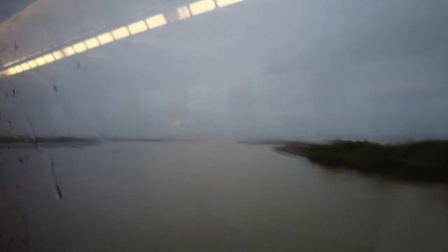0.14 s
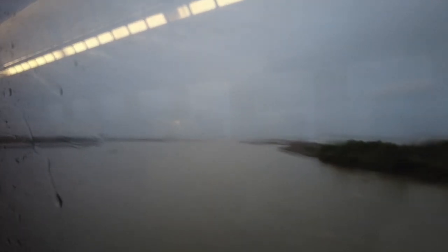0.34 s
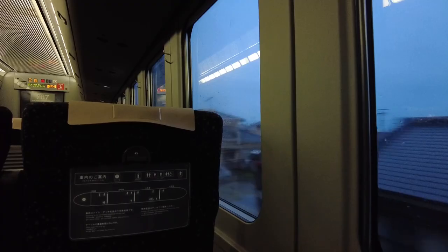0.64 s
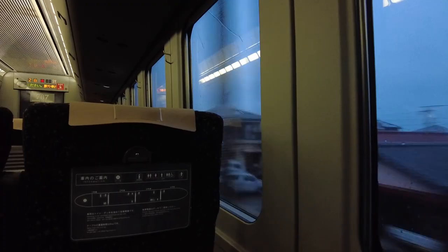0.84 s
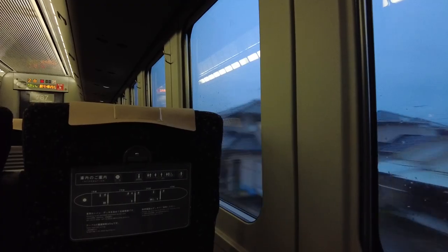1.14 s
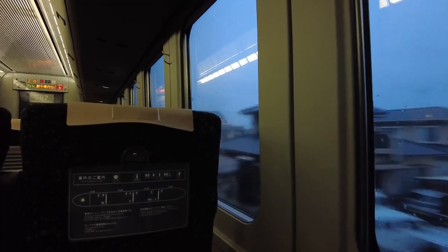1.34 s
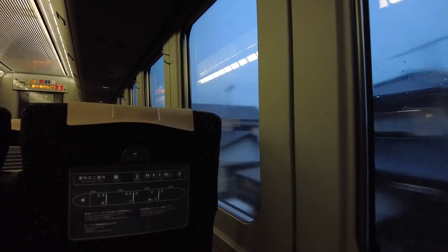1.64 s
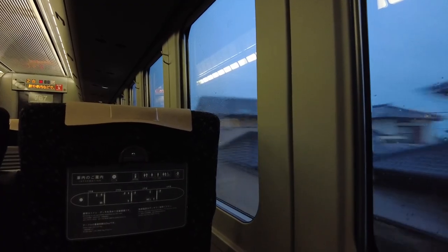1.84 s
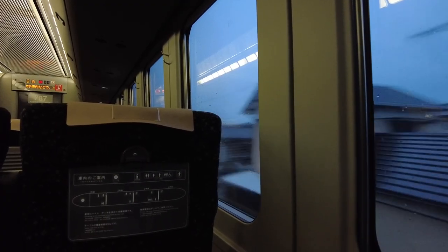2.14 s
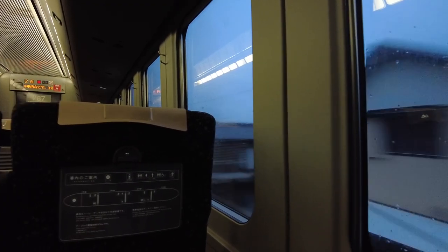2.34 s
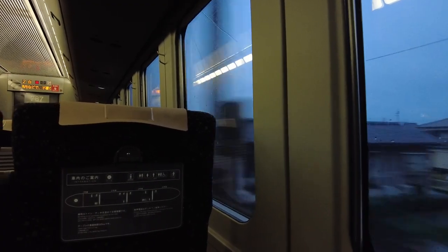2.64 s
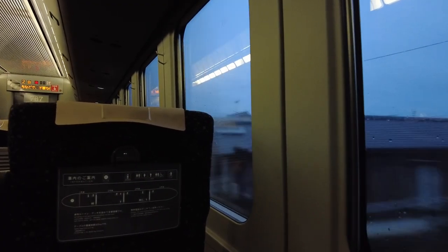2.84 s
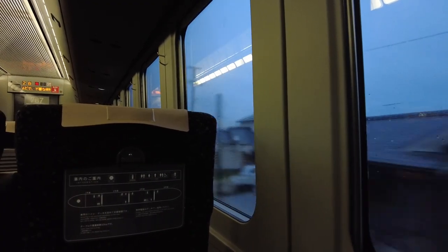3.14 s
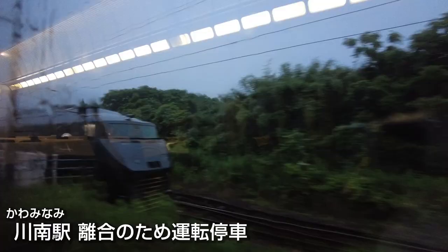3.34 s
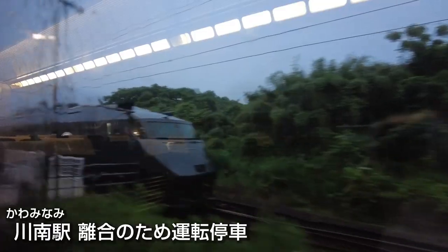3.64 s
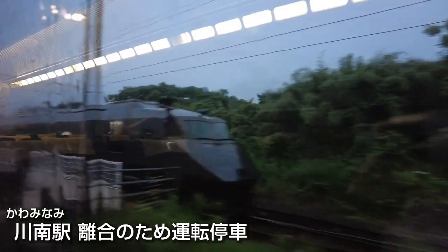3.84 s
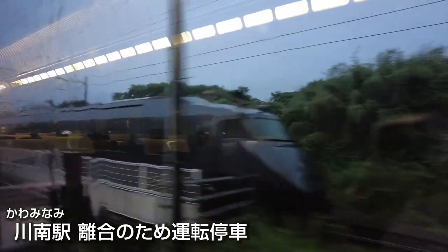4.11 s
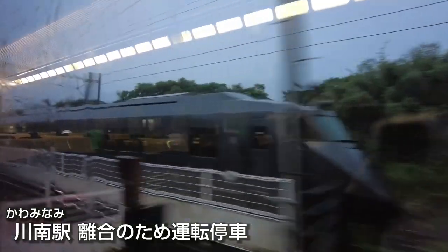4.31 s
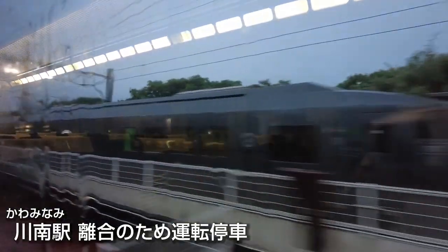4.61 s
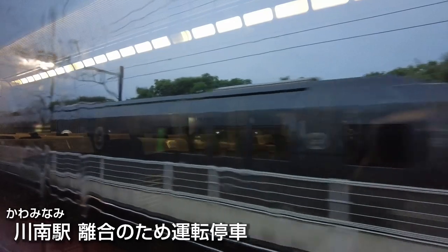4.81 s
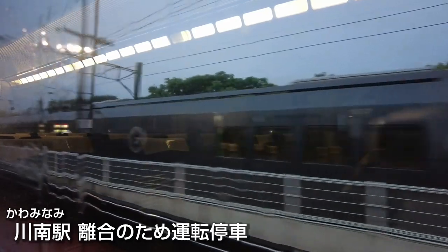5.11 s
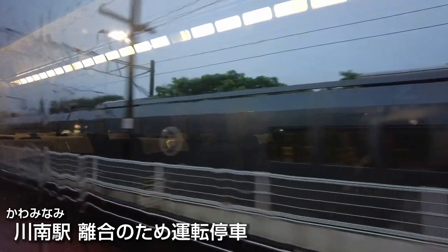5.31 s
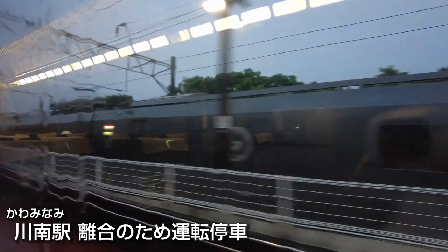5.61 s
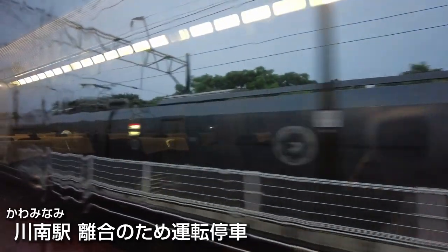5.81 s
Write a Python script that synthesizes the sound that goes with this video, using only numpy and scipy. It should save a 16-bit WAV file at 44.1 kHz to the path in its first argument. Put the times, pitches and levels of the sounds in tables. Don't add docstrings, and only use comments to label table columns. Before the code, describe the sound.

Inside a train carriage: boomy bridge rumble with a low hum, then loud fast rail clatter with rattling trim, then a much quieter low roll.

```python
import sys
import numpy as np
from scipy import signal
from scipy.io import wavfile
from scipy.ndimage import uniform_filter1d, minimum_filter1d

SR = 44100
rng = np.random.default_rng(int(sys.argv[2]) if len(sys.argv) > 2 else 0)


def attenuation_scalar(level_db):
    decades = np.asarray(level_db, float) / 20
    return 10 ** decades


def wav_out(sig):
    wavfile.write(sys.argv[1], SR, np.round(np.clip(np.atleast_2d(sig).T, -1, 1) * 32767).astype(np.int16))


N = 262836
RUN_IN, STEP, TAIL = SR // 6, 40, SR // 5
JOIN_S = .0025
OPPOSITE = np.array([[1], [-1]])


def rms_one(x):
    return x / np.sqrt(np.mean(x ** 2) + 1e-20)


def peak_one(x):
    return x / np.max(abs(x))


def at_hz(points, hz):
    table_hz, values = np.transpose(points)
    return np.interp(np.log(hz), np.log(table_hz), values)


def filtered(x, order, hz, kind="low"):
    return signal.sosfilt(signal.butter(order, hz, kind, fs=SR, output="sos"), x)


def resonate(x, hz, width_hz):
    r = np.exp(-np.pi * width_hz / SR)
    poles = [1, -2 * r * np.cos(2 * np.pi * hz / SR), r * r]
    return signal.lfilter(np.array([1, 0, -1]) * (1 - r * r) / 2, poles, x)


def resonate_twice(x, hz, width_hz):
    return resonate(resonate(x, hz, width_hz), hz, width_hz)


def drift(rate, size):
    r = np.exp(-2 * np.pi * STEP * rate / SR)
    wander = signal.lfilter([1], [1, -2 * r, r * r], rng.standard_normal(size + 2000))
    return rms_one(wander[2000:])


def faded(size):
    n = np.arange(size)
    return np.sin(np.pi / 2 * np.clip(np.minimum(n, size - n) / (JOIN_S * SR), 0, 1)) ** 2


def burst(rise_s, t60, size=TAIL):
    t = np.arange(size) / SR
    return (1 - np.exp(-t / rise_s)) * attenuation_scalar(-60 * t / max(t60, .02)) * faded(2 * size)[size:]


def leaned(db):
    return attenuation_scalar(db * np.array([[.5], [-.5]]))


# f/Hz, side minus mid level/dB
SIDE_DB = [(60, -24.5), (130, -18), (290, -12.5), (640, 2), (1410, -4), (3100, -2.5), (6820, 1.5),
           (15000, 2)]
# f/Hz, left minus right level/dB
LEAN = [(60, -1.5), (180, 0.5), (550, 2), (1650, 0.5), (4970, 0), (15000, 0.5)]


def spread(pair, hz):
    side = attenuation_scalar(at_hz(SIDE_DB, hz))
    both = (pair[0] + side * pair[1] * OPPOSITE) / np.sqrt(1 + side ** 2)
    return both * leaned(at_hz(LEAN, hz))


def add(out, s, sound):
    start = round(s * SR)
    cut = min(round(b * SR) for a, b in TAKES if b > s)
    end = min(start + sound.shape[-1], cut, N)
    size = end - start
    out[:, start:end] += sound[..., :size] * faded(2 * size)[size:]


# start t/s, end t/s
TAKES = [
    (0, .6645),
    (.6645, 3.3985),
    (3.3985, 5.96),
]
# f/Hz, level/dB per Hz
BRIDGE = [(9.4, -31), (16, 6.5), (38, -7.5), (85, -4.5), (107, -27), (123, 2), (147, -15), (269, -9),
          (310, -25.5), (414, -32.5), (675, -28.5), (981, -66.5), (1310, -53.5), (2200, -60), (7000, -72.5),
          (15600, -82)]
# f/Hz, level/dB per Hz
FAST = [(9.4, -31), (16, 3.5), (49, 0.5), (147, -9.5), (226, -15), (414, -21.5), (478, -32), (601, -31.5),
        (715, -40), (981, -51), (1270, -45), (2130, -56), (3100, -57), (6950, -70), (15600, -81)]
# f/Hz, level/dB per Hz
SLOW = [(9.4, -30), (16, 6), (37, -3.5), (54, -5), (98, -5), (169, -17), (246, -15), (310, -33.5),
        (521, -27.5), (695, -40), (953, -78.5), (1240, -50.5), (1960, -55), (3010, -58.5), (6300, -67),
        (7300, -72.5), (11500, -77.5), (13600, -83), (15600, -83.5)]
ROLLING_DB = [-20.5, -17.5, -27]


def carriage():
    out = np.zeros((2, N))
    for take, colour in enumerate([BRIDGE, FAST, SLOW]):
        start, end = (min(round(s * SR), N) for s in TAKES[take])
        end = min(end + round(JOIN_S * SR), N)
        n = start + np.arange(-RUN_IN, end - start)
        swell = swells(n[::STEP] / SR, take)
        swell -= 10 * np.log10(np.mean(10 ** (swell / 10), axis=1, keepdims=True))
        roll = attenuation_scalar(ROLLING_DB[take]) * rms_one(rolling(take, colour, n, swell))
        roll = roll + hollows(take, n, swell)
        out[:, start:end] += roll[:, RUN_IN:] * faded(end - start)
    return out


ZONES_HZ = [38, 150, 600, 2500]


def rolling(take, colour, n, swell):
    steps = n[::STEP]
    patchy_db = [1.5, 1.1, 1.2][take]
    together = drift(9, len(steps))
    white = rng.standard_normal((2, 2, len(n)))
    edges = 16 * 2 ** (np.arange(31) / 3)
    out = 0
    for k, (low, high) in enumerate(zip(edges, edges[1:])):
        hz = np.sqrt(low * high)
        place = np.interp(np.log(hz), np.log(ZONES_HZ), np.arange(4))
        below = min(int(place), 2)
        zone_db = swell[below] + (place - below) * (swell[below + 1] - swell[below])
        flicker_db = patchy_db * (0.61 * together + drift(8.8, len(steps)))
        if hz > 900:
            flicker_db = flicker_db * 1.5
        if take == 2 and hz > 3500:
            flicker_db = flicker_db * .4
        band = filtered(white[k % 2], 3 if 300 < hz < 2000 else 2, [low, high], "band")
        gain = np.interp(n, steps, attenuation_scalar(at_hz(colour, hz) + zone_db + flicker_db))
        out = out + gain * spread(steadied(band, hz, share=0.61), hz)
    return out


# f/Hz, width f/Hz, then level/dB on the bridge, fast, slow
HOLLOWS = [(28.03, 6.8, -19, -32, -32.5), (42.96, 5.6, -23.5, -19.5, -42.5), (249.5, 64, -39.5, -44, -34),
           (432.1, 12, -49.5, -44.5, -52), (699, 36, -64.5, -50, -56.5), (1240, 91, -61, -62.5, -64.5),
           (1634, 83, -91, -76, -80.5), (2900, 850, -68, -67, -69.5), (14900, 400, -92, -88.5, -99),
           (896, 18, -74, -60.5, -70.5)]


def hollows(take, n, swell):
    white = rng.standard_normal((2, 2, len(n)))
    out = 0
    for k, (hz, width_hz, *take_db) in enumerate(HOLLOWS):
        tone = rms_one(resonate_twice(white[k % 2], hz, width_hz))
        zone = np.argmin(abs(np.log(hz / np.array(ZONES_HZ))))
        gain = attenuation_scalar(take_db[take]) * np.interp(n, n[::STEP], attenuation_scalar(0.83 * swell[zone]))
        out = out + gain * spread(steadied(tone, hz, share=0.92), hz)
    return out


def steadied(x, hz, share):
    if hz > 260:
        return x
    power = uniform_filter1d(x[0, ::STEP] ** 2, max(round(2 * SR / hz / STEP), 1))
    mean = np.mean(power)
    gain = (mean / (power + 0.013 * mean)) ** (np.clip(share * 60 / hz, 0, .9) / 2)
    smooth = np.interp(np.arange(x.shape[1]) / STEP, np.arange(len(gain)), gain)
    return np.array([x[0] * smooth, x[1]])


# t/s, boom level/dB at the top, half length t/s
HEAVES = [(0.163, -14.5, 0.084), (0.383, -22.5, 0.04), (0.643, -19.5, 0.03), (0.888, -16.5, 0.033),
          (0.99, -14.5, 0.037), (1.174, -14, 0.033), (1.369, -15, 0.073), (1.524, -12, 0.029),
          (1.723, -14.5, 0.074), (1.899, -12.5, 0.041), (2.268, -15.5, .09), (2.415, -13, 0.037),
          (2.644, -22, .05), (2.768, -11, 0.089), (2.959, -16, 0.063), (3.145, -16, 0.055),
          (3.365, -22.5, 0.037), (3.556, -26.5, 0.049), (4.158, -28, 0.072), (4.461, -32, 0.065),
          (4.79, -29, 0.089), (5.112, -27.5, .07), (5.379, -25.5, 0.043), (5.607, -17.5, 0.028),
          (5.763, -22.5, .06)]
CALM_BOOM_DB = [-24.5, -24.5, -33]
JOINT_DB = [2.5, 2.6, 11.9, 6.3, 5.7, 11]
# t/s, jolt level/dB over the calm roar
LONE_JOINTS = [
    (.078, 11),
    (.178, 18),
    (4.61, 6.5),
    (5.027, 10.5),
    (5.175, 7),
]
# middle t/s, level/dB, half length t/s
STRETCHES = [(0.682, -3, 0.059), (0.972, 2.5, 0.071), (1.212, -4, 0.034), (1.271, 4, 0.13),
             (1.59, -2, 0.081), (1.899, -4.5, 0.11), (2.104, 2.5, 0.089), (2.551, -4.5, 0.15),
             (3.02, -3.5, 0.05), (3.298, -5.5, 0.096)]


def swells(t, take):
    s, top_db, half_s = np.transpose(HEAVES)[:, :, None]
    heaving = np.sum(attenuation_scalar(2 * top_db) * np.exp(-((t - s) / half_s) ** 2), axis=0)
    boom = attenuation_scalar(2 * CALM_BOOM_DB[take]) + heaving
    if take == 1:
        first_s, every_s, share = .83, .459, 1
        joints = [(first_s + k * every_s, level_db) for k, level_db in enumerate(JOINT_DB)]
    else:
        joints, share = LONE_JOINTS, 0.31
    s, peak_db, half_s = np.transpose(STRETCHES)[:, :, None]
    rough_db = np.sum(peak_db * np.exp(-((t - s) / half_s) ** 2), axis=0) * (take == 1)
    walls = surges(t, joints, share * 0.045)
    floor = attenuation_scalar(2 * 0.88 * rough_db) + attenuation_scalar(2 * -9) * surges(t, joints, share * 0.22)
    stir = attenuation_scalar(2 * 46) * surges(t, RATTLES, 0.045) * (take < 2)
    hiss = attenuation_scalar(2 * 0.14 * rough_db) + attenuation_scalar(2 * -8) * walls + stir
    return 10 * np.log10([boom, floor, attenuation_scalar(2 * rough_db) + walls, hiss])


def surges(t, events, dies_s):
    s, level_db = np.transpose(events)[:2, :, None]
    age = np.maximum(t - s, 0)
    rise = (1 - np.exp(-age / 0.0019)) ** 2
    return np.sum(attenuation_scalar(2 * level_db) * rise * np.exp(-age / dies_s), axis=0)


# t/s, peak level/dB, floor panel f/Hz,
# clang level/dB above it, ring t60 t/s
KNOCKS = [(.078, -26, 215, -17, 0.27), (.2, -17, 238, -11.5, 0.087), (.83, -17, 154.5, -9.5, 0.2),
          (0.932, -13.5, 163, -38, 0.049), (1.23, -15, 185, -24, 0.19), (1.315, -18, 240, -15, 0.17),
          (1.385, -20.5, 178.2, -26.5, 0.24), (1.762, -26.5, 279, -7, 0.34), (1.759, -13, 132.3, -31, 0.14),
          (1.839, -13.5, 151, -20.5, 0.059), (2.014, -26.5, 257.6, -16, 0.18),
          (2.153, -12.5, 147, -36.5, 0.078), (2.217, -10, 144.8, -20.5, 0.21),
          (2.226, -16.5, 240.4, -13.5, 0.065), (2.656, -14.5, 138.3, -16, 0.59),
          (2.732, -13, 137.8, -15, 0.73), (2.839, -19, 135, -23, 0.12), (2.913, -15.5, 151, -30, 0.13),
          (3.056, -13, 198.4, -26.5, 0.1), (3.135, -16.5, 194.5, -26, 0.11), (3.33, -14, 57.6, -33, 0.64),
          (4.654, -18.5, 95.7, -38.5, 0.6), (5.559, -27.5, 47, -42, .5), (5.728, -17.5, 32.8, -34.5, 1)]


def knocks():
    size = 2 * TAIL
    out, t = np.zeros((2, N)), np.arange(size) / SR
    for s, level_db, hz, clang_db, t60 in KNOCKS:
        panel = np.sin(2 * np.pi * hz * t) * burst(0.011, t60, size)
        neighbours = np.sin(2 * np.pi * 0.28 * hz * t) - np.sin(2 * np.pi * 1.28 * hz * t)
        neighbours = neighbours * burst(0.0059, 0.2, size)
        thump = peak_one(panel) + attenuation_scalar(-11.5) * peak_one(neighbours)
        late = 0.11 * np.roll(thump, TAIL // 100) * OPPOSITE
        noise = rng.standard_normal((2, size)) * burst(0.0011, .3, size)
        clang = filtered(resonate(resonate(noise, 480, 450), 510, 460), 3, 880)
        clang = attenuation_scalar(clang_db) * peak_one(spread(clang, 600))
        add(out, s - .004, attenuation_scalar(level_db) * (thump * leaned(.8) + late + clang))
    return out


# top t/s, peak level/dB, f/Hz, rise t/s
PINGS = [(0.102, -48, 914, 0.0065), (0.107, -38, 663, 0.0056), (0.192, -27.5, 695, 0.0055),
         (0.2, -46, 920, 0.0099), (0.22, -33, 468, 0.006), (0.229, -38, 740, 0.006),
         (0.247, -41, 851, 0.006), (0.663, -41, 995, 0.0071), (0.836, -38, 782, 0.0059),
         (0.858, -40, 783, 0.0066), (0.963, -24.5, 393, 0.0067), (1.073, -39.5, 760, 0.0088),
         (1.31, -41, 794, 0.0054), (1.342, -36, 744, 0.0067), (1.424, -31.5, 642, 0.011),
         (1.462, -37, 650, 0.0086), (1.502, -36.3, 702, 0.0097), (1.544, -32, 638, 0.006),
         (1.761, -34.5, 695, 0.016), (1.771, -32.5, 850, 0.0056), (1.776, -18, 289, 0.008),
         (1.781, -32, 506, 0.006), (1.816, -44, 910, 0.0046), (1.841, -37, 613, 0.0073),
         (1.856, -43.5, 863, 0.0059), (1.911, -37.5, 699, 0.023), (2.235, -28.5, 527, 0.006),
         (2.26, -35.5, 679, 0.006), (2.262, -53, 958, 0.0064), (2.681, -43, 700, 0.011),
         (2.686, -44.5, 840, 0.011), (2.734, -49, 896, 0.006), (2.774, -44.5, 897, 0.007),
         (3.148, -33.5, 546, 0.006), (3.155, -39.5, 745, 0.0078), (3.168, -43.5, 860, 0.013),
         (3.4, -55, 915, 0.005), (3.402, -53, 700, 0.0044), (4.62, -43, 716, 0.006),
         (4.747, -35.5, 713, 0.0064), (5.034, -53, 897, 0.0068), (5.034, -43, 540, 0.006),
         (5.036, -37, 712, 0.013), (5.068, -38, 570, 0.006), (5.131, -41, 702, 0.011),
         (5.183, -40, 462, 0.006), (5.196, -38.5, 690, 0.0066), (5.692, -57, 950, 0.0047)]
# top t/s, peak level/dB, f/Hz, rise t/s
CHINKS = [(.212, -49, 1395, 0.0052), (.656, -56, 3190, 0.0028), (.791, -53, 4460, 0.005),
          (.796, -53, 5560, 0.0035), (1.754, -48, 2460, .005), (1.756, -49.5, 2700, 0.006),
          (1.846, -53, 2660, 0.0049), (1.875, -45, 1540, .004), (1.926, -54, 4382, .004),
          (1.93, -46, 1610, 0.0032), (2.0, -56, 4380, .004), (2.008, -53, 5512, 0.0036),
          (2.013, -59, 3413, .004), (2.07, -60, 4700, .004), (2.103, -48, 3170, 0.0026),
          (2.105, -47.5, 2840, .003), (2.292, -56, 4760, .004), (2.3, -56, 5517, 0.0038),
          (3.332, -58, 4280, 0.0046), (3.335, -61, 5930, .004), (5.029, -57, 1530, 0.0065),
          (5.09, -48.5, 1226, 0.0057), (5.175, -50, 1260, 0.0047), (5.198, -54, 1315, 0.0054)]
# top t/s, peak level/dB, f/Hz, rise t/s
THROBS = [(.112, -24.5, 263, .01), (.212, -18.5, 264.5, 0.01104), (.878, -15.5, 141.3, .012),
          (1.26, -18, 241.5, 0.01372), (1.858, -23, 282, .011), (2.696, -16, 145.2, 0.0194),
          (2.814, -19, 142.7, 0.0154), (3.577, -32, 282, 0.01214), (4.21, -27.5, 228.5, 0.0134),
          (4.32, -26, 270.7, 0.01227), (4.505, -28.5, 257, 0.01176), (4.844, -30.5, 246.7, .012),
          (4.949, -27.5, 248.4, 0.0146), (5.151, -29, 248.7, .024), (5.582, -26.5, 269, .012),
          (5.642, -29.5, 256.6, 0.0201), (5.902, -24.5, 249.6, 0.0117), (5.937, -28, 279.6, 0.0125),
          (.025, -39.5, 551, .018), (.335, -43.5, 600, 0.0087), (.395, -47.5, 812, 0.022),
          (.85, -23.5, 306, .01), (.985, -36, 652, 0.014), (1.215, -40, 643, .012),
          (1.335, -36.5, 556, 0.0078), (1.663, -35.5, 620, .008), (1.685, -28.5, 322, .01),
          (2.665, -21.5, 326, 0.01044), (2.735, -31, 454, .03), (3.09, -27.5, 311, 0.01484),
          (2.24, -19, 203, 0.013), (3.138, -17.5, 212, .008), (1.322, -21, 279, 0.01053)]


def ringing_parts():
    return ring(PINGS, slower=1.3) + ring(CHINKS, slower=1.05) + ring(THROBS, slower=1.105)


def ring(rows, slower):
    out, t = np.zeros((2, N)), np.arange(TAIL) / SR
    for (s, level_db, hz, rise_s), turns in zip(rows, rng.random((len(rows), 2))):
        rise_s = slower * max(rise_s, .001)
        tone = np.sin(2 * np.pi * (hz * t + turns[:, None]))
        envelope = t / rise_s * np.exp(1 - t / rise_s)
        take_start = max(a for a, b in TAKES if a <= s)
        add(out, max(s - rise_s, take_start), attenuation_scalar(level_db) * envelope * spread(tone, hz))
    return out


# t/s, peak level/dB, f/Hz, left minus right level/dB
RATTLES = [(0.04, -54.5, 2960, -7.5), (0.1745, -62, 3090, -9), (0.3982, -52.5, 2870, 0.5),
           (0.509, -51, 3280, 4), (0.6567, -58.5, 3000, 7), (0.7892, -47, 4530, 10), (0.948, -47, 2930, -2),
           (0.9827, -49.5, 2880, 0), (1.023, -49, 2720, 1), (1.091, -42, 3080, 0), (1.2357, -55.5, 2920, 5),
           (1.4804, -48, 2790, -5), (1.7427, -40, 2760, -1.5), (1.8243, -47, 3110, 1),
           (1.925, -41.5, 4300, 1), (1.9977, -39, 4360, -4), (2.098, -58, 2790, -27),
           (2.172, -49.5, 2970, -1), (2.2883, -44, 2800, -1.5), (2.7332, -47, 2780, 0),
           (2.82, -44.5, 2700, 1.5), (2.9547, -47, 2900, 7), (3.013, -49.5, 2720, -2),
           (3.1414, -50.5, 2920, 1), (3.2844, -52, 2940, 18), (3.3242, -41, 4300, -2)]


def rattles():
    out = np.zeros((2, N))
    for s, level_db, hz, lean_db in RATTLES:
        noise = rng.standard_normal((2, TAIL)) * burst(0.00098, 0.13)
        chatter = resonate(noise, hz, 350) + attenuation_scalar(-5.0) * resonate(noise, 4400, 300)
        chatter = filtered(chatter + attenuation_scalar(-8.0) * resonate_twice(noise, 4200, 5200), 6, 6600)
        add(out, s, attenuation_scalar(level_db - 3.5) * leaned(lean_db) * peak_one(spread(chatter, 3000)))
    return out


# start t/s, length t/s, rms level/dB, f/Hz, width f/Hz
SHUDDERS = [(0.184, 0.033, -51, 700, 452), (0.646, 0.03, -62.5, 4000, 3000), (0.78, 0.02, -57, 1600, 300),
            (1.24, 0.038, -56.5, 2930, 1310), (1.303, .045, -55, 2900, 1700),
            (1.369, 0.0097, -53.5, 2640, 1500), (1.402, 0.17, -41.5, 660, 100),
            (1.735, 0.035, -51.5, 2610, 607), (1.807, 0.087, -53.5, 2400, 1220),
            (1.899, 0.044, -47, 673, 90), (2.001, 0.079, -63.5, 4580, 1800),
            (2.284, 0.035, -60.5, 4800, 2500), (2.73, 0.067, -65, 4530, 1515),
            (2.786, 0.052, -53, 1604, 250), (3.174, 0.041, -61.5, 4470, 2510),
            (3.318, 0.042, -52.5, 1580, 398), (3.321, 0.02, -56, 5800, 705), (3.36, .036, -61, 5200, 2600),
            (2.595, .05, -71.5, 11050, 6000), (2.778, 0.17, -72.5, 11000, 7000),
            (1.787, 0.18, -74, 10560, 7000), (3.322, 0.039, -61.5, 4250, 500),
            (4.599, 0.069, -61.5, 1380, 900), (5.027, 0.021, -54, 1210, 1097),
            (5.164, 0.035, -56.5, 1250, 360)]


def shudders():
    size = TAIL + TAIL // 4
    out, t = np.zeros((2, N)), np.arange(size) / SR
    for s, length_s, level_db, hz, width_hz in SHUDDERS:
        clicks = rng.standard_normal((2, size)) * attenuation_scalar(2 * rng.exponential(1, size))
        shaking = np.clip(t / 0.0049, 0, 1) * attenuation_scalar(-600 * np.maximum(t - length_s, 0))
        body = rms_one(resonate_twice(clicks, hz, width_hz))
        add(out, s, attenuation_scalar(level_db) * shaking * faded(size) * spread(body, hz))
    return out


# t/s, peak level/dB, top f/Hz
SNAPS = [
    (.001, -38.5, 3000),
    (.042, -48, 4500),
    (0.508, -44.5, 5000),
    (0.6545, -50, 4500),
    (0.6644, -36.5, 2780),
    (2.1, -46, 7960),
    (3.013, -55, 9440),
    (3.3983, -29.5, 1580),
    (5.033, -52, 995),
]


def snaps():
    out, size = np.zeros((2, N)), TAIL // 8
    for s, level_db, top_hz in SNAPS:
        click = rng.standard_normal((2, size)) * burst(.001, .022, size)
        click = filtered(click, 3, [top_hz / 9, top_hz], "band")
        add(out, s, attenuation_scalar(level_db) * peak_one(click[0] + 0.17 * click[1] * OPPOSITE))
    return out


# t/s, peak level/dB, tilt level/dB from lowest to highest mode
TICKS = [(0.072, -59, -9.5), (0.252, -62, -5.5), (0.327, -58, -10.5), (0.402, -58.5, -8), (0.664, -64, -1),
         (0.732, -64, -3.5), (0.7884, -59.5, -1.5), (0.909, -61.5, -5.5), (.985, -59, 0.5),
         (1.022, -38.5, -1.5), (1.088, -46.5, -6), (1.1862, -60, -5.5), (1.534, -61.5, -1),
         (1.628, -58.5, -7.5), (1.6496, -52.5, 6), (1.6895, -50.5, -6), (1.775, -51, -9),
         (1.861, -56.5, -3), (2.288, -57.5, 0), (2.533, -59, 0.5), (2.585, -48.5, -9.5),
         (2.6588, -44.5, -8), (2.835, -55, -4.5), (2.868, -59, -4.5), (2.9103, -48.5, -8.5),
         (3.0139, -60.5, -7), (3.1834, -54.5, 1.5), (3.275, -56, 3), (3.331, -57.5, -7.5),
         (5.168, -69, -15.5)]
# f/Hz, width f/Hz, level/dB
TICK_MODES = [(9200, 1300, 1), (9900, 900, 1), (10800, 1400, -1), (12900, 1400, -4.5), (15000, 1500, -5)]


def ticks():
    out, t60 = np.zeros((2, N)), 0.03
    slow = attenuation_scalar(-12.0) * burst(0.011, 4.6 * t60)
    shapes = [burst(.012 * (9000 / hz) ** 2, t60) + slow for hz, _, _ in TICK_MODES]
    for s, level_db, tilt_db in TICKS:
        noise = rng.standard_normal((2, TAIL))
        count = len(TICK_MODES)
        strengths_db = rng.normal(0, 0.79, count) + np.linspace(0, tilt_db, count)
        tick = 0
        for k, (hz, width_hz, mode_db) in enumerate(TICK_MODES):
            mode = resonate(noise * shapes[k], hz, width_hz)
            tick = tick + attenuation_scalar(mode_db + strengths_db[k]) * mode * (-1) ** k
        tick = filtered(tick, 4, 7000, "high")
        add(out, s - .003, attenuation_scalar(level_db + 1.5) * leaned(2) * peak_one(spread(tick, 3000)))
    return out


# start t/s, length t/s, rms level/dB, f/Hz
SQUEAKS = [(.79, 0.027, -79, 14360), (0.949, 0.01, -79, 14800), (0.984, 0.022, -71.5, 14600),
           (1.35, .02, -72.5, 14900), (1.966, .035, -77, 14800), (2.94, 0.065, -75, 11800),
           (3.18, .03, -74, 14900)]


def squeaks():
    out, t = np.zeros((2, N)), np.arange(TAIL // 2) / SR
    for s, length_s, level_db, hz in SQUEAKS:
        tone = rms_one(resonate_twice(rng.standard_normal((2, len(t))), hz, 120))
        gain = attenuation_scalar(level_db - 1500 * np.maximum(t - length_s, 0)) * faded(len(t))
        add(out, s, gain * spread(tone, hz))
    return out


# t/s, peak level/dB, f/Hz
CLANKS = [
    (4.615, -39.5, 740),
    (4.733, -33, 663),
    (5.032, -32.5, 694),
    (5.119, -32.5, 640),
    (5.191, -35, 675),
]


def clanks():
    out = np.zeros((2, N))
    for s, level_db, hz in CLANKS:
        noise = rng.standard_normal((2, TAIL)) * burst(0.0057, 0.11)
        clank = resonate_twice(noise, hz, 220)
        add(out, s - .002, attenuation_scalar(level_db - 2.0) * peak_one(spread(clank, hz)))
    return out


# t/s, f/Hz, level/dB
HUM = [
    (0, 118.6, -22.5),
    (.15, 119.8, -22.5),
    (.3, 120.3, -20.5),
    (.5, 120.4, -22),
    (.6, 119.5, -31),
    (.66, 115, -25.5),
]


def hum():
    s, hz, level_db = np.transpose(HUM)
    t, steps = np.arange(N) / SR, N // STEP
    tone = np.sin(2 * np.pi * np.cumsum(np.interp(t, s, hz)) / SR)
    waver_db = 1.4 * np.interp(np.arange(N) / STEP, np.arange(steps), drift(13, steps))
    edges = np.clip(np.minimum(t, TAKES[0][1] - t) / JOIN_S, 0, 1)
    return np.sqrt(2) * attenuation_scalar(np.interp(t, s, level_db) + waver_db) * tone * edges


def scene():
    blows = knocks() + clanks() + rattles() + ticks() + shudders() + snaps() + squeaks()
    return carriage() + blows + ringing_parts() + hum()


# lowest f/Hz of the band, share of the time it is kept
STARVED = [
    (12800, .1),
    (13450, .2),
    (14150, .5),
    (14850, .7),
    (15500, .55),
]


def starved(x):
    start, lead_s = round(TAKES[2][0] * SR) - RUN_IN, RUN_IN / SR + .03
    hz, frames, bins = signal.stft(x[:, start:], SR, nperseg=1024)
    chance = uniform_filter1d(rng.standard_normal((len(STARVED) + 1, len(frames))), size=4)
    tops_hz = [low_hz for low_hz, _ in STARVED[1:]] + [SR]
    for (low_hz, share), high_hz, own in zip(STARVED, tops_hz, chance[1:]):
        luck = own + chance[0]
        kept = (luck < np.quantile(luck, share)) | (frames < lead_s)
        bins[:, (hz >= low_hz) & (hz < high_hz)] *= kept
    patchy = signal.istft(bins, SR, nperseg=1024)[1][:, :N - start]
    return np.concatenate([x[:, :start], patchy], axis=1)


def band_limit(x):
    return signal.sosfilt(signal.butter(12, 15700, fs=SR, output="sos"), x)


def record(dry):
    room = np.minimum(1, .604 / (np.max(abs(dry), axis=0) + 1e-9))
    lowest = minimum_filter1d(room, size=801)
    gain = uniform_filter1d(uniform_filter1d(lowest, size=400), size=400)
    mix = starved(gain * dry)
    return band_limit(mix)


dry = scene()
out = record(dry)
wav_out(out)
```